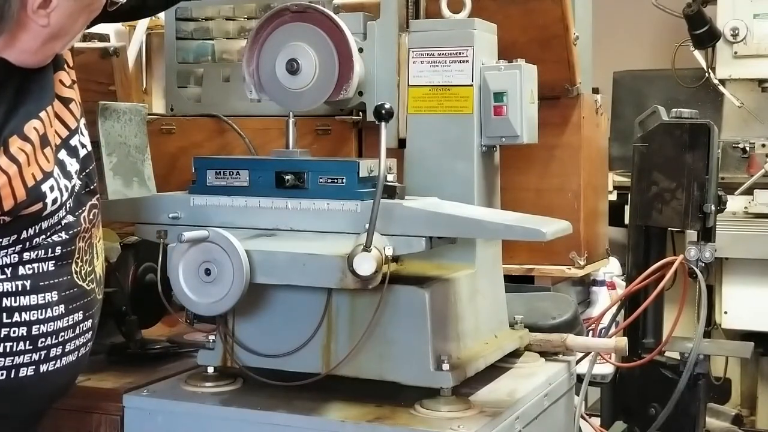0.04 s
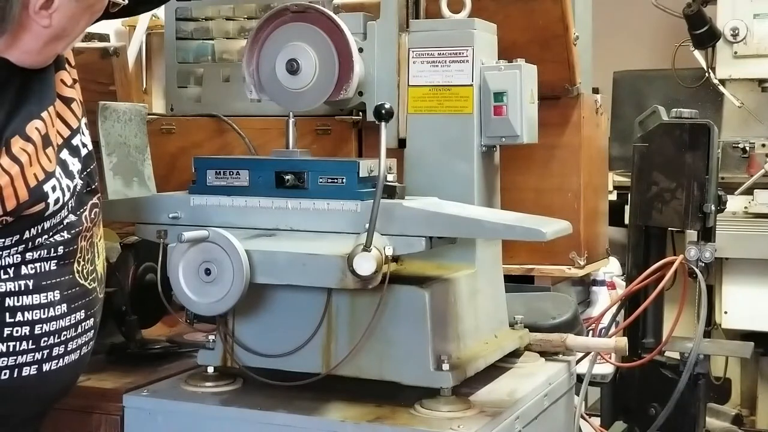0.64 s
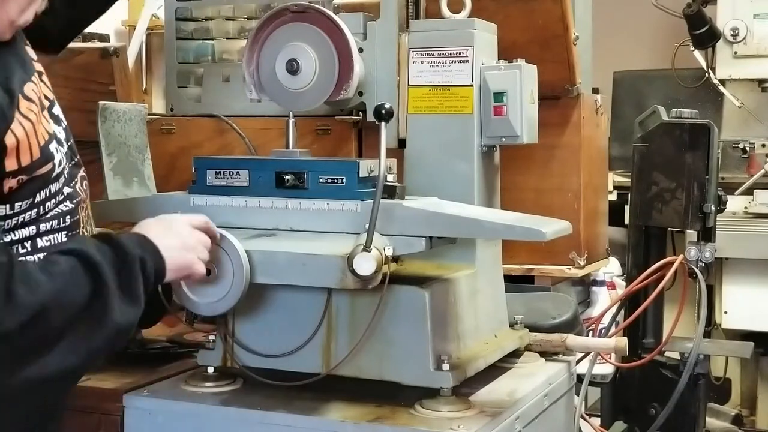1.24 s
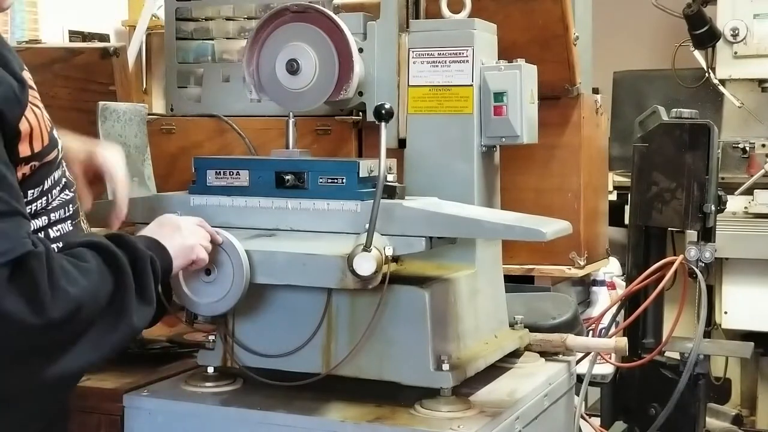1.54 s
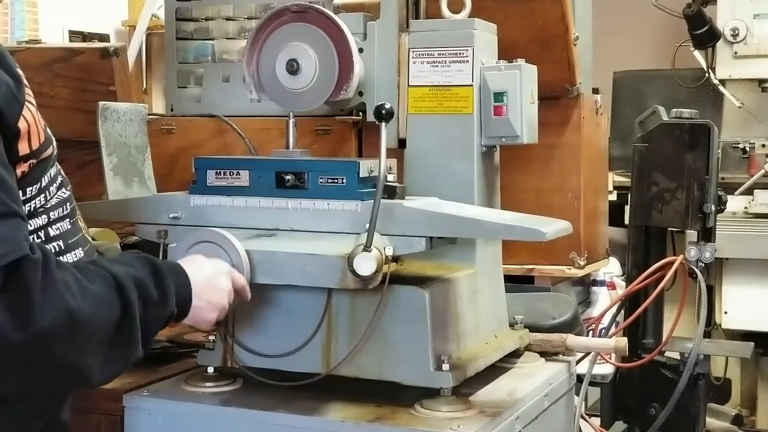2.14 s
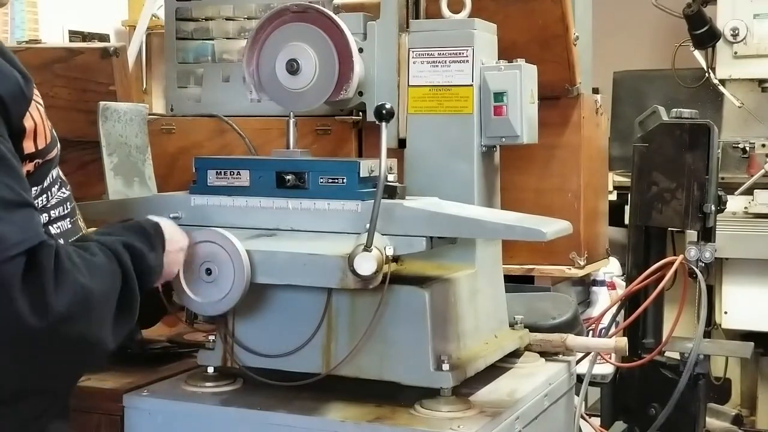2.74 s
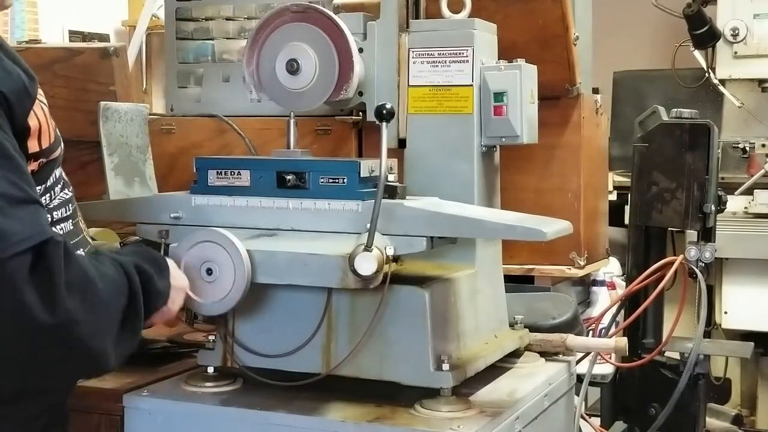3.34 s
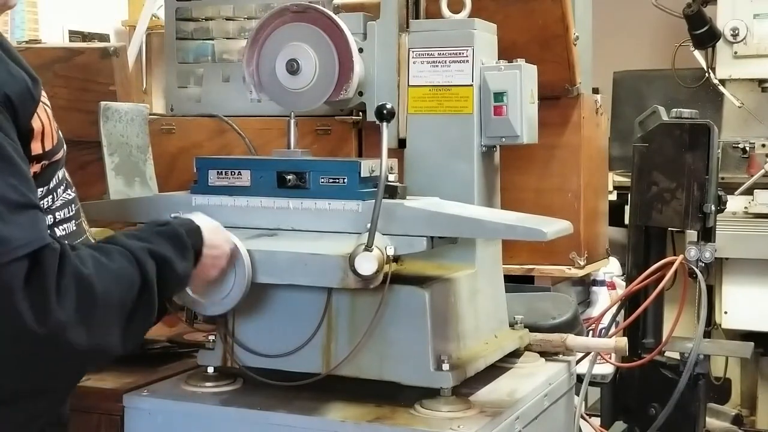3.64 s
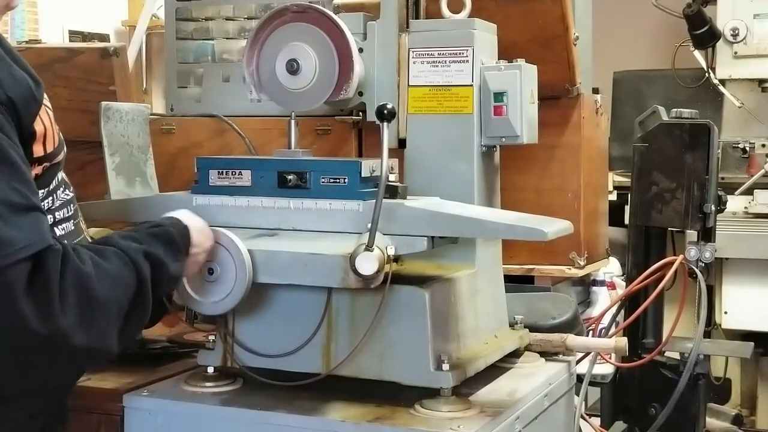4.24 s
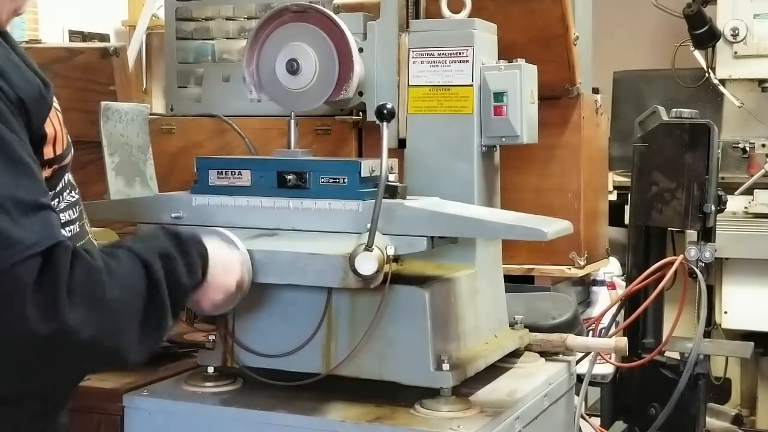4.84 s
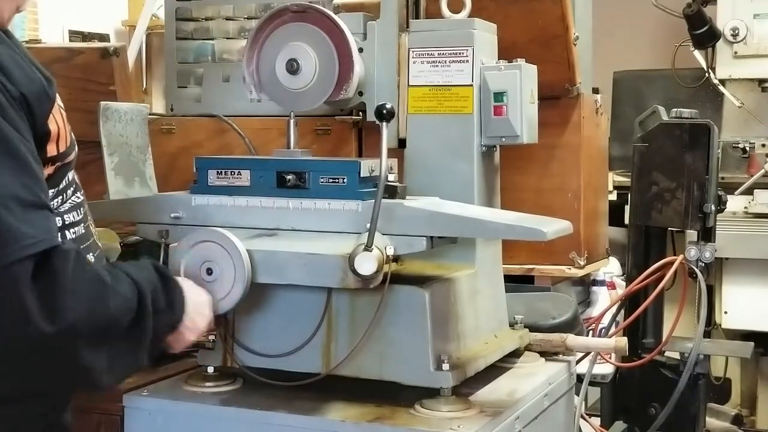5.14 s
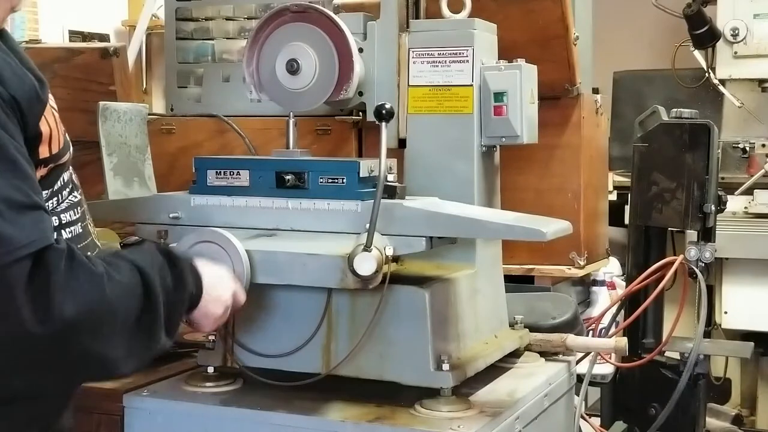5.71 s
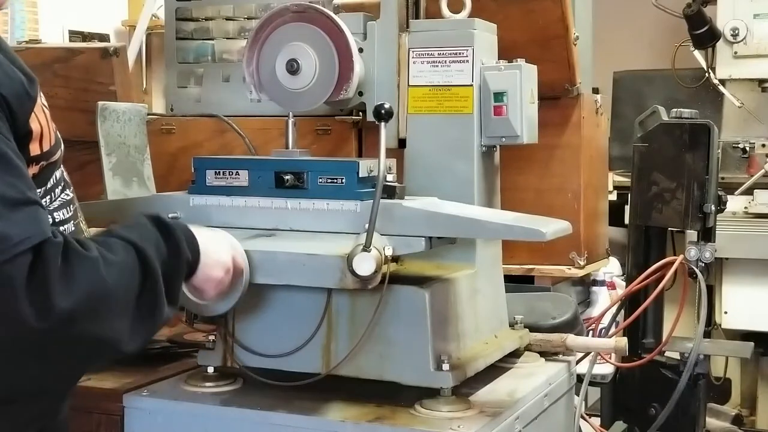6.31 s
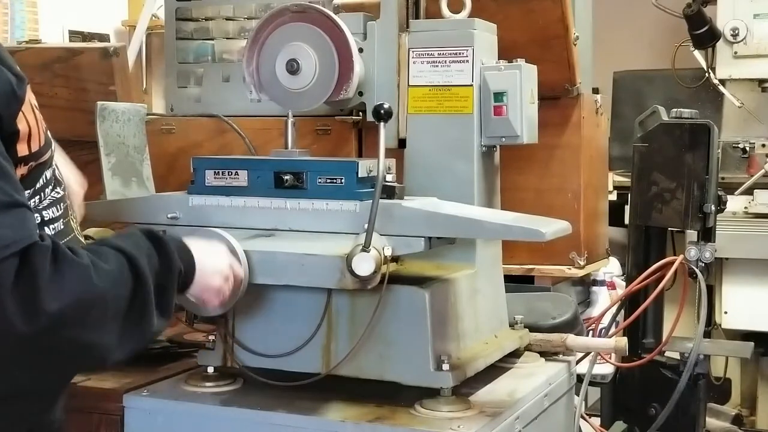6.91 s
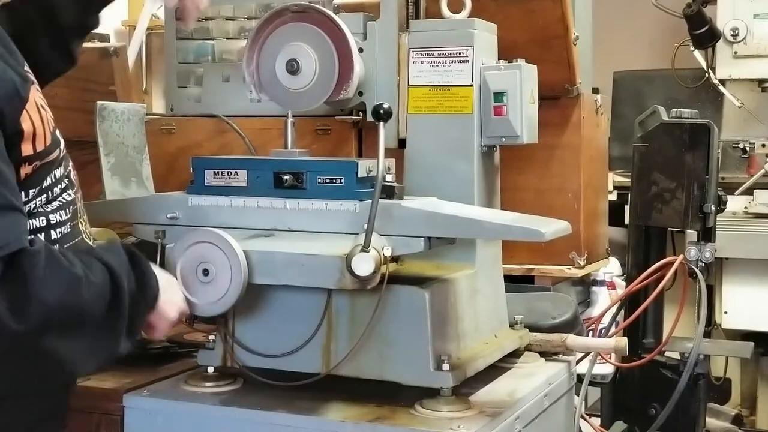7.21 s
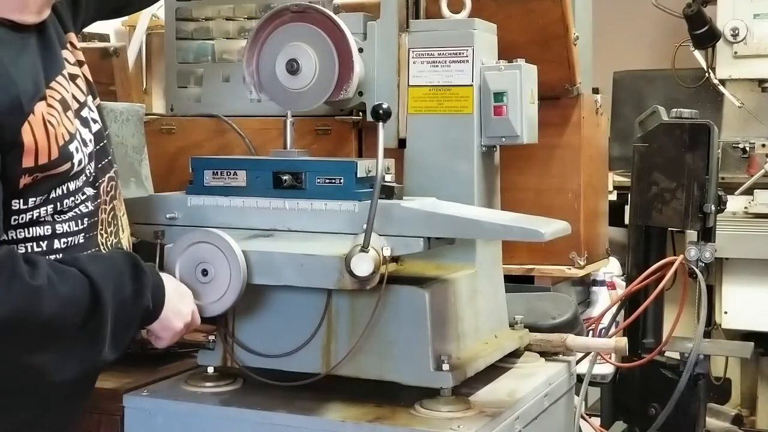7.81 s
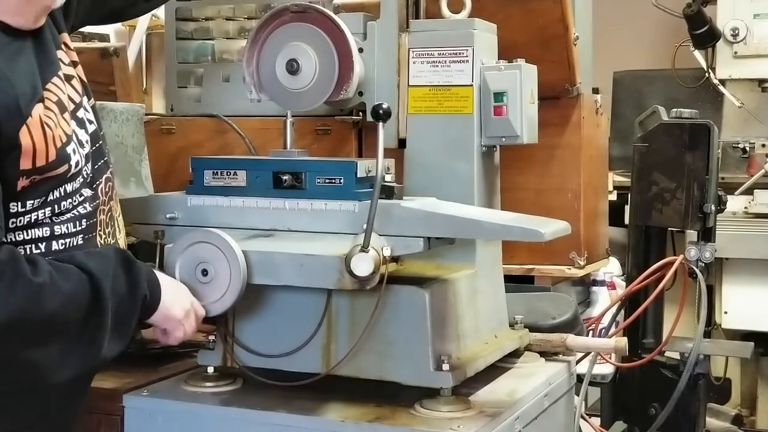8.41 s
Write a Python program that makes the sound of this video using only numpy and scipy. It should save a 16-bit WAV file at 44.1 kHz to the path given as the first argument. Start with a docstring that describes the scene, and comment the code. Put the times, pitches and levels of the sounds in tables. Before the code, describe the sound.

In a small workshop, a surface grinder hums and whirrs steadily. A diamond tip scrapes the spinning wheel with a brief, bright hiss right at the start. After a pause, a longer pass swells with high ringing tones and flickering squeals. The machine runs alone again, then a shorter, heavier pass bites abruptly with a coarser rasp, leaving only the hum. The sound is fairly close, with little echo.

```python
"""In a small workshop, a surface grinder runs while a diamond is cranked across its wheel three times.
The motor hums and the spindle whirrs throughout. The diamond meets nearly the same grits on every
turn, so its hiss is a comb of pitches spaced by the wheel speed. Breaking grits add a rasp. The grits
also make the wheel and the diamond's holder ring and squeal at their modes (natural pitches)."""
import sys
import numpy as np
from scipy import signal
from scipy.fft import rfft, irfft
from scipy.io import wavfile
from scipy.ndimage import uniform_filter1d, map_coordinates

SR = 44100
rng = np.random.default_rng(int(sys.argv[2]) if len(sys.argv) > 2 else 0)


def store_wav(level_fs):
    """Save 16-bit WAV to argv[1]."""
    pcm = np.round(np.clip(np.atleast_2d(level_fs), -1, 1) * 32767)
    wavfile.write(sys.argv[1], SR, pcm.T.astype(np.int16))


N = 381906
TIME = np.arange(N) / SR
WHEEL_HZ, TOP_HZ = 59.755, 15790  # turns per second; highest pitch heard
HEAVY_FROM_S = 5.9  # the last pass is a heavy cut
FLUTTER_DB, FLUTTER_PER_S = 1.7, 26  # chance flutter of the ringing tones

# Heard level of the background whirr and hum, ducked (turned down) during and after loud passes.
# Each row: time in seconds, relative level in dB.
BACKGROUND_LEVEL = [(0.0, -47.5), (2.65, -48), (4.38, -49.5), (6.34, -47.5), (6.42, -51.5), (6.51, -49.5),
                    (7.34, -51.5), (8.5, -47.5)]
# Whirr of spindle and air, low part then high. Each row: frequency in Hz, relative level in dB.
WHIRR_LOW_COLOUR = [(22, -20), (33, -4), (48, -17), (95, -9), (150, -5.5), (190, 1), (245, 3.5), (285, 0),
                    (430, 4), (560, 0), (715, 4.5), (800, 3.5), (920, 7.5), (1060, 2), (1250, -2),
                    (1530, 4), (1850, -3)]
WHIRR_HIGH_COLOUR = [(2180, 0.5), (2310, 4), (2390, -5), (2900, -2.5), (3040, -1), (3250, -3), (5000, -5.5),
                     (7100, -8.5), (7600, -11), (10000, -13.5), (12700, -9.5), (14200, -16), (15700, -13.5)]
# How alike the whirr is left and right. Each row: frequency in Hz, likeness (1 means the same).
WHIRR_LIKENESS = [(60, 0.86), (290, 0.72), (640, 0.25), (1410, -0.049), (3100, 0.12), (6800, -0.081),
                  (15000, 0.022)]
# Tones of motor and bearings. Each row: pitch in Hz, relative level in dB, left minus right in dB,
# left phase lead in radians.
MOTOR_TONES = [(358.7, -49.5, -2.5, .5), (95, -73, 0, .2), (186, -66, -1, .2), (430.7, -61, 0, .3),
               (717.3, -61.5, 1, .8), (877.5, -63.5, 0, .5), (917, -64, 2, .5), (961, -63, 2, .8),
               (1077, -63.5, -5, .5), (1195, -66.5, 0, .5), (1318, -60, 4, 1.0), (1532, -65.5, 3, 1.0),
               (2304, -68, 0, 1.0), (3042, -70, 0, 1.0)]
# Passes of the diamond. Each row: start, length, bite time, deepening time and run-out time in seconds,
# depth in dB before and after deepening, easing in dB per second.
DIAMOND_PASSES = [(-.045, .36, .16, .2, .19, -36.5, -35.5, 5), (1.56, 2.585, .08, 1.14, .41, -39, -32, 1.2),
                  (5.897, 1.1, .016, .1, .28, -30.3, -30.8, 8)]
# The scrape as it shakes table and casting, then its hiss. Each row: frequency in Hz, relative dB.
BODY_COLOUR = [(130, -34), (215, 2), (450, -71), (760, 0), (1150, -17.5), (1300, -7), (1420, -16),
               (1700, -3.5)]
HISS_COLOUR = [(2050, -13), (2380, -3.5), (2560, 1), (2680, 0.5), (2950, -9.5), (3150, -7.5), (3400, -2),
               (3750, -3.5), (4250, -4.5), (4780, -13), (5030, 2.5), (5210, 12), (5380, 5.5), (5570, 15),
               (5690, -2.5), (5790, -13), (6050, -14), (6450, -8), (7350, -10.5), (7850, -2), (8350, 0.5),
               (8750, -1.5), (9400, 1.5), (9750, 3), (10150, 2.5), (10650, 6.5), (11500, 3), (12050, 1),
               (12600, 9.5), (13350, 8.5), (13750, -3), (14400, -7), (15650, 7)]
# Where the scrape is heard. Each row: frequency in Hz, left minus right in dB.
SCRAPE_BALANCE = [(2500, .5), (8000, -1), (11500, -1), (12800, 6), (13600, 5), (14700, -2), (15600, 3)]
# The part of the hiss that a heavy cut chokes: low edge and high edge in Hz.
CHOKED_BAND = [1000, 4850]
# The buzz around the wheel's lowest two modes: low edge and high edge in Hz.
BUZZ_BAND = [4850, 5750]
# The room's echo. Each row: frequency in Hz, seconds to fade by 60 dB.
ROOM_DECAY = [(300, 0.087), (3000, 0.063), (8000, 0.13), (15000, 0.063)]
# Rasp of breaking grits. Each row: frequency in Hz, relative level in dB.
RASP_COLOUR = [(1900, -25), (2400, 8), (2520, 6), (2680, 12), (2900, 14), (3100, 13.5), (3230, 8),
               (3440, 16), (3620, -18), (4600, -45)]
# The wheel's six modes, in three pairs. Each entry: pitch in Hz.
WHEEL_MODE_HZ = [5139.3, 5497, 8544.5, 9023.5, 12488.5, 13086.5]
# The same modes. Each row: width in Hz, left minus right in dB, left phase lead in radians.
WHEEL_MODE_SHAPES = [(24, -4.5, 2.05), (18, 1.5, 1.1), (32, -1, 2.0), (26, 1.5, 2.35), (30, 6, -1.3),
                     (28, 6, 2.1)]
# How those modes answer the cut. Each row: relative level in dB, extra dB of ring per dB of depth,
# levels of the noisy twin and of the side tone in dB against the main tone.
WHEEL_MODE_DRIVE = [(0, .55, -19, -14), (-.3, 1.0, -22, -15), (-3.7, .45, -12, -10), (-.7, .6, -13, -10),
                    (-1, .14, -7.5, -13), (1.8, .6, -10, -16)]
# Squeals that mostly lift nearby modes. Each row: middle and length in seconds, rise in dB, pitch in Hz.
CUT_SQUEALS = [(0.182, .3, 8.5, 8930), (.14, 0.14, -3, 13100), (0.235, 0.074, 11, 5640),
               (0.06, 0.077, 12, 5400), (.12, .2, 0, 2700), (1.626, 0.14, 19, 5400),
               (1.66, 0.092, 10, 8850), (1.667, 0.16, 8.5, 12700), (1.867, 0.19, 8, 5590),
               (1.952, 0.08, 9.5, 5300), (2.36, 0.064, 2, 5100), (2.44, .1, 5, 8700),
               (2.48, 0.056, 8.5, 5500), (2.56, 0.11, 5.5, 5100), (2.576, 0.072, 15, 2390),
               (2.648, 0.17, 9.5, 5460), (2.687, 0.09, 3, 8850), (2.8, .09, -4, 5400), (2.79, .08, 7, 2390),
               (2.83, .1, 1, 13150), (2.873, 0.076, 9, 2390), (2.96, 0.14, 19, 2390),
               (2.952, 0.16, 10, 2630), (2.934, .1, 6, 13000), (2.96, 0.2, 8, 12050),
               (3.112, 0.18, 10.5, 5540), (3.094, 0.12, 6, 13150), (3.25, .07, 9, 2390),
               (3.277, 0.081, 3, 5060), (3.417, 0.052, 3.5, 5100), (3.3, 0.099, 7, 2600),
               (3.46, .09, 11, 2390), (3.467, 0.16, 2, 5460), (3.4, .5, 2, 3360), (3.624, .09, 9, 2390),
               (3.628, 0.097, 13, 12270), (3.674, 0.088, 18, 5345), (3.725, 0.084, 9.5, 8740),
               (3.84, 0.14, 4, 5200), (3.893, 0.076, 10.5, 13200), (4.01, 0.18, 14, 8850),
               (5.967, .1, 4, 8700), (6.026, .1, 12.5, 5380), (6.055, 0.049, 6.5, 5040),
               (6.12, .16, 6, 2380), (6.358, 0.098, 6.5, 5370), (6.4, 0.12, 7, 8700),
               (6.425, 0.064, 11, 5030), (6.422, .1, 7, 2390), (6.448, 0.18, 10.5, 13140),
               (6.473, 0.093, 13.5, 5590), (6.592, 0.22, 13.5, 4980), (6.6, 0.12, 11.5, 2390),
               (6.73, .09, 12, 13200), (6.7, 0.13, 4, 8840), (6.897, 0.15, 12, 12850), (6.9, .1, 7, 5530),
               (6.914, 0.11, 11, 8800)]
# A ringing tone briefly loses its grip. Each row: middle and length in seconds, dB change, pitch in Hz.
GRIP_BREAKS = [(.1, .2, -3, 5140), (1.74, .07, -9, 5500), (1.825, .06, -11, 5100), (1.88, 0.16, -11, 12500),
               (2.09, .08, -6, 5140), (2.21, .07, -7, 5140), (2.3, .05, -9, 5140), (2.49, .06, -4, 5100),
               (2.51, .03, -9, 12500), (2.57, .04, -5, 5530), (2.62, .03, -6, 5140),
               (2.718, 0.045, -12, 5100), (2.88, .06, -5, 5500), (2.98, 0.13, -6, 5100),
               (3.21, .04, -6, 5140), (3.33, .09, -8, 5380), (3.46, .04, -9, 5120),
               (3.565, .045, -10, 5320), (3.73, 0.04, -14, 5300), (3.95, .06, -6, 5500),
               (6.2, 0.13, -10, 5320), (6.24, .06, -9, 8780), (6.72, .05, -8, 5140)]
# Weaker modes of holder and chuck. Each row: pitch in Hz, relative level in dB, left minus right in dB.
UPPER_HOLDER_MODES = [(2570, -26, 0), (2629.2, -22, 1), (2689, -21.5, 3), (2808.5, -24, 4),
                      (3286.5, -25, -4), (3406, -24, -2), (3525.5, -30, 3), (4541.4, -26, -1)]


def amp(db):
    """Turns decibels into a gain."""
    return 10 ** (np.asarray(db) / 20)


def unit_level(x):
    """Scales a signal to an average power of 1."""
    return x / np.sqrt(np.mean(abs(x) ** 2) + 1e-20)


def look_up(points, hz):
    """Reads between the rows of a (Hz, value) table, on a log-frequency axis."""
    row_hz, value = np.transpose(points)
    return np.interp(np.log(hz + 1), np.log(row_hz + 1), value)


def drift(rate_hz):
    """A smooth random wander, mostly slower than rate_hz."""
    hz = np.fft.rfftfreq(N, 1 / SR)
    return unit_level(irfft(rfft(rng.standard_normal(N)) * np.exp(-(hz / rate_hz) ** 2), N))


def stereo(wave, side_db, lead):
    """Places a complex tone: the left side is side_db louder and lead radians ahead."""
    left = amp(side_db / 2) * wave * np.exp(1j * lead)
    right = amp(-side_db / 2) * wave
    return np.sqrt(2) * np.array([left, right]).real


def rim_roughness(memory, spread_db, spots=738):
    """Random bumps around a spinning rim; memory is the share that survives from turn to turn."""
    turns = TIME * WHEEL_HZ
    shape = (int(turns[-1]) + 2, spots)
    rim = rng.standard_normal(shape) * amp(spread_db * rng.standard_normal(shape))
    rim = signal.lfilter([np.sqrt(1 - memory ** 2)], [1, -memory], rim, axis=0, zi=memory * rim[-1:])[0]
    return unit_level(map_coordinates(rim.ravel(), [turns * spots], order=3))


def spindle_whirr(level_db=7.0):
    """Bearings and stirred air make a broad noise that partly repeats with each turn."""
    hz = np.fft.rfftfreq(N, 1 / SR)
    left, other = (rfft(rim_roughness(memory=0.17, spread_db=1.5)) for _ in range(2))
    likeness = look_up(WHIRR_LIKENESS, hz)
    right = likeness * left + np.sqrt(1 - likeness ** 2) * other
    colour = amp(look_up(WHIRR_LOW_COLOUR + WHIRR_HIGH_COLOUR, hz))
    return unit_level(irfft(np.array([left, right]) * colour, N)) * amp(level_db)


def motor_hum(cut, tones_db=-1.4, wobble=0.26, rise_at_s=7.7, rise_s=0.09, rise_db=5.5, dip_db=-6):
    """Wavering motor and bearing tones, over the shaft's once-a-turn shake and the magnetic hum."""
    out = np.zeros((2, N))
    wanders = np.array([drift(5.5) for _ in range(4)])
    for k, (hz, db, side_db, lead) in enumerate(MOTOR_TONES):
        waver, slip = (unit_level(rng.standard_normal(len(wanders)) @ wanders) for _ in range(2))
        waver_db = 2.5 if k else 1.0  # the first tone, the main drone, is the steadiest
        phase = 2 * np.pi * (hz * TIME + rng.random()) + wobble * hz / MOTOR_TONES[0][0] * slip
        out += stereo(amp(tones_db + db + waver_db * waver) * np.exp(1j * phase), side_db, lead)
    risen = np.clip((TIME - rise_at_s) / rise_s, 0, 1)
    shake_db = -65.5 + 2.2 * wanders[0]
    magnetic_db = -67 + wanders[1] + rise_db * risen  # steps up after the last pass
    thinning_db = dip_db * (cut / cut.max()) ** 2  # both thin out as the cut deepens
    for per_turn, db in [(1, shake_db), (2, magnetic_db)]:
        tone = np.exp(2j * np.pi * (per_turn * WHEEL_HZ * TIME + rng.random()))
        out += stereo(amp(db + thinning_db) * tone, side_db=1.0, lead=0.76)
    return out


def depth_of_cut(bite_power=1.17, run_out_db=-27):
    """Depth as a gain: the diamond bites, moves to its full depth, eases off and runs off the rim."""
    cut = np.zeros(N)
    for start, length, bite, deepening, run_out, first_db, later_db, easing in DIAMOND_PASSES:
        t = TIME - start
        biting = np.clip(t / bite, 0, 1) ** bite_power
        deeper = np.clip(t / deepening, 0, 1) ** 2
        leaving = np.maximum(1 + (t - length) / run_out, 0) ** 2
        db = first_db + (later_db - first_db) * deeper - easing * np.maximum(t - deepening, 0)
        cut += biting * amp(db + run_out_db * leaving)
    return cut


def diamond_scrape(grits, chips, cut, level_db=7.0, chip_gain=.55, choke_db=-4.5, buzz_growth=.4):
    """The diamond chips the grits: a bright hiss that follows the depth. A heavy cut hollows it out."""
    hz = np.fft.rfftfreq(N, 1 / SR)
    # Within about 22 Hz of a wheel mode, the hiss gives way to the mode's own tone.
    gaps = 1 - sum(np.exp(-((hz - mode_hz) / 22) ** 2) for mode_hz in WHEEL_MODE_HZ)
    colour = amp(look_up(BODY_COLOUR + HISS_COLOUR, hz)) * gaps * (hz < TOP_HZ)
    hiss = unit_level(irfft(rfft(grits + chip_gain * chips) * colour, N))
    choked = irfft(rfft(hiss) * (hz > CHOKED_BAND[0]) * (hz < CHOKED_BAND[1]), N)
    hiss = hiss - choked + choked * amp(choke_db * (TIME > HEAVY_FROM_S))
    buzz = irfft(rfft(hiss) * (hz > BUZZ_BAND[0]) * (hz < BUZZ_BAND[1]), N)
    hiss = hiss - buzz + buzz * (cut / cut.max()) ** buzz_growth  # the buzz grows faster than the rest
    flutter_db = .8 * drift(29)
    heard = room_echo(hiss * cut * amp(level_db + flutter_db), wet_db=5.5)
    side_db = look_up(SCRAPE_BALANCE, hz) / 2
    return irfft(rfft(heard) * amp([side_db, -side_db]), N)


def room_echo(x, wet_db, size=16384, echoes_per_s=3000):
    """The direct sound plus dense, short reflections that differ left and right."""
    echoes = rng.standard_normal((2, size)) * (rng.random((2, size)) < echoes_per_s / SR)
    hz, t, spectrum = signal.stft(echoes, SR, nperseg=256)
    fade = amp(-60 * t / look_up(ROOM_DECAY, hz)[:, None])
    tail = signal.istft(spectrum * fade, SR, nperseg=256)[1]
    response = amp(wet_db) * tail / np.linalg.norm(tail, axis=1, keepdims=True)
    response[[0, 1], [0, 2]] += 1  # the direct sound, two samples later on the right
    return signal.fftconvolve(x[None], response, axes=1)[:, :N] / np.sqrt(1 + amp(wet_db) ** 2)


def grit_rasp(chips, cut, level_db=-19.5, heavy_db=9.5, growth_db_per_s=4.5):
    """Breaking grits rattle the holder in coarse clumps, most of all in the heavy last pass."""
    colour = amp(look_up(RASP_COLOUR, np.fft.rfftfreq(N, 1 / SR)))
    rattle = unit_level(irfft(rfft(chips) * colour, N))
    clumps = unit_level(amp(4 * drift(70)))
    extra_db = (TIME > HEAVY_FROM_S) * (heavy_db + growth_db_per_s * (TIME - HEAVY_FROM_S))
    return room_echo(rattle * clumps * cut * amp(level_db + extra_db), wet_db=8.0)


def singing_mode(roughness, hz, width_hz, settle_s=0.16, skirt_hz=200):
    """A mode picks out the roughness near its own pitch and sings, held at a nearly even level."""
    tone = np.exp(2j * np.pi * hz * TIME)
    swing = roughness / tone  # shifts the pitch to 0 Hz, where smoothing keeps only what is near it
    for keep in np.exp(-np.pi * np.array([width_hz, skirt_hz]) / SR):
        swing = signal.lfilter([1 - keep], [1, -keep], swing)
    power = uniform_filter1d(abs(swing) ** 2, int(settle_s * SR))
    return tone * swing / np.sqrt(power + 1e-12)


def squeal_gain(hz, wander_db, wander_per_s=11):
    """A mode's gain wanders by chance and follows the squeals and grip breaks near its pitch."""
    t = np.linspace(0, TIME[-1], 1000)
    wander_times = np.arange(200) / wander_per_s
    db = wander_db * np.interp(t, wander_times, rng.standard_normal(len(wander_times)))
    for middle, length, change_db, pitch in CUT_SQUEALS + GRIP_BREAKS:
        off_pitch = np.log2(hz / pitch) / 0.066  # each reaches about 0.066 octaves
        db += change_db * np.exp(-(2 * (t - middle) / length) ** 2 - off_pitch ** 2)
    return np.interp(TIME, t, amp(db))


def wheel_ring(grits, chips, cut, level_db=5.0, build_s=0.13):
    """The wheel's modes build up under a lasting cut. Only their clean main tones swell in a squeal."""
    out = np.zeros((2, N))
    keep = np.exp(-1 / (build_s * SR))
    built_up = signal.lfilter([1 - keep], [1, -keep], cut / cut.max()) + 1e-9
    for hz, drive, (width, side_db, lead) in zip(WHEEL_MODE_HZ, WHEEL_MODE_DRIVE, WHEEL_MODE_SHAPES):
        db, growth, twin_db, side_tone_db = drive
        tone = singing_mode(grits, hz, width, settle_s=.05, skirt_hz=25)
        tone *= squeal_gain(hz, FLUTTER_DB, FLUTTER_PER_S)
        side_tone = amp(side_tone_db) * singing_mode(grits, hz + WHEEL_HZ, width, skirt_hz=40)
        # A disc's mode has a twin, turned by a quarter wave, that is heard in another phase.
        twin = amp(twin_db) * stereo(singing_mode(chips, hz, width), side_db, lead + np.pi)
        out += (stereo(tone + side_tone, side_db, lead) + twin) * amp(db) * built_up ** growth
    return amp(level_db) * cut * out


def holder_ring(grits, cut, lowest_hz=2390.2, lowest_db=-24.0, choke_db=-4, width_hz=14, lead=0.4):
    """The holder's modes ring with the cut. The lowest squeals hardest; a heavy cut chokes the rest."""
    upper = np.zeros((2, N))
    for hz, db, side_db in UPPER_HOLDER_MODES:
        tone = singing_mode(grits, hz, width_hz, settle_s=0.5) * squeal_gain(hz, wander_db=6.0)
        upper += stereo(amp(db) * tone, side_db, lead)
    upper *= amp(choke_db * (TIME > HEAVY_FROM_S))
    lowest = stereo(singing_mode(grits, lowest_hz, width_hz, settle_s=.05, skirt_hz=60), 0, lead)
    lowest *= squeal_gain(lowest_hz, FLUTTER_DB, FLUTTER_PER_S)
    return cut * (upper + amp(lowest_db) * lowest)


def scene():
    """Over the whirr and hum, bonded grits and loose chips drive the scraping and ringing."""
    grits = rim_roughness(memory=0.73, spread_db=5.0)  # mostly come back on the next turn
    chips = rim_roughness(memory=0, spread_db=7.0)  # never come back
    cut = depth_of_cut()
    heard_gain = amp(np.interp(TIME, *np.transpose(BACKGROUND_LEVEL)))
    background = heard_gain * spindle_whirr() + heard_gain / heard_gain.mean() * motor_hum(cut)
    scraping = diamond_scrape(grits, chips, cut) + grit_rasp(chips, cut)
    ringing = wheel_ring(grits, chips, cut) + holder_ring(grits, cut)
    return background + scraping + ringing


def record(dry, threshold_db=-30, squeeze=0.091, recover_db_per_s=11.0):
    """A gentle gain control turns loud moments down and recovers; then the top treble is cut off."""
    power_db = 10 * np.log10(abs(uniform_filter1d((dry ** 2).mean(0), 3000)) + 1e-12)
    fall = TIME * recover_db_per_s / squeeze
    held_db = np.maximum.accumulate(power_db + fall) - fall  # jumps to each peak, then sinks steadily
    over_db = np.maximum(held_db - threshold_db, 0)
    ducked = dry / amp(squeeze * uniform_filter1d(over_db, 400))
    low_pass = signal.firwin(1023, TOP_HZ, window=("kaiser", 8), fs=SR)
    return signal.oaconvolve(ducked, low_pass[None], "same")


dry = scene()
out = record(dry)
store_wav(out)
```